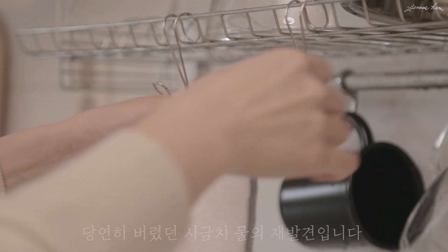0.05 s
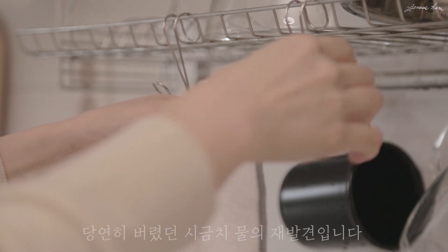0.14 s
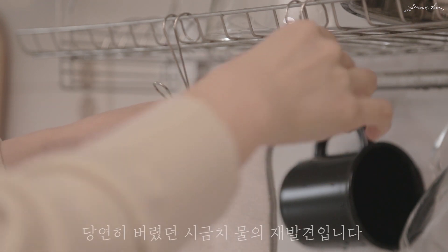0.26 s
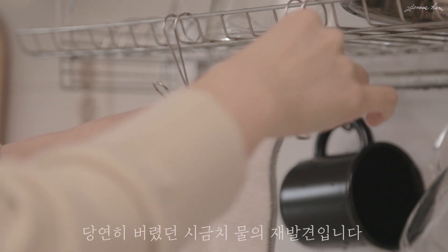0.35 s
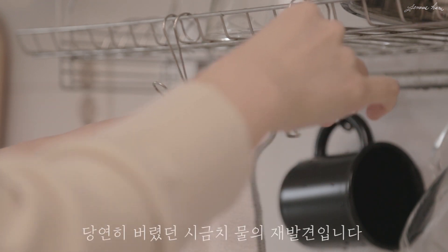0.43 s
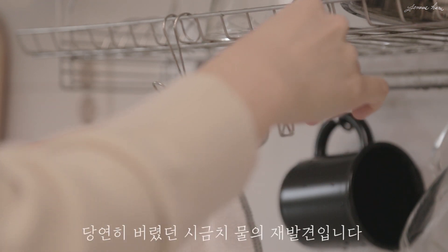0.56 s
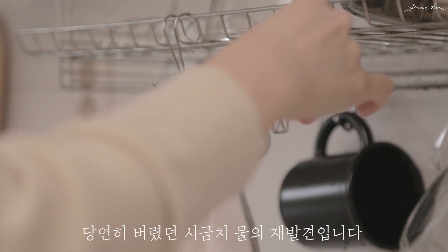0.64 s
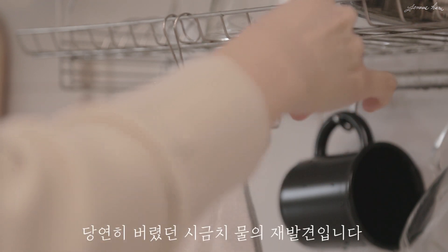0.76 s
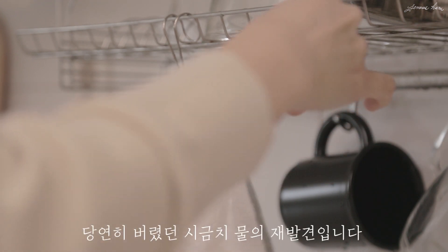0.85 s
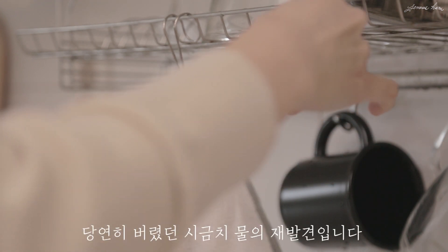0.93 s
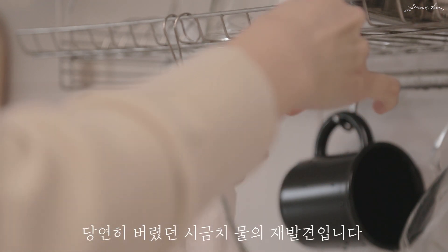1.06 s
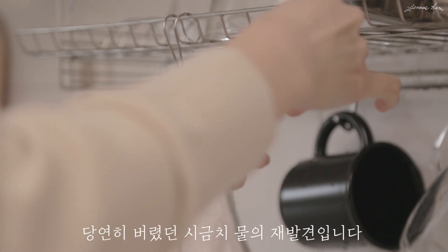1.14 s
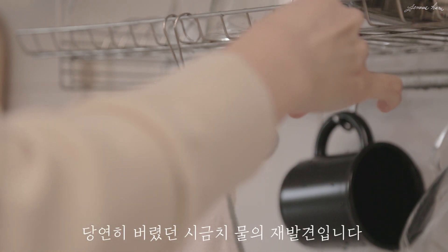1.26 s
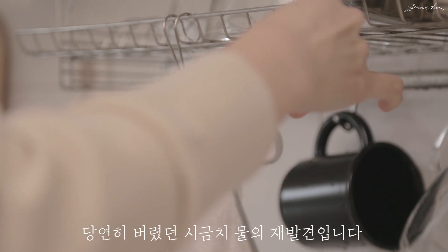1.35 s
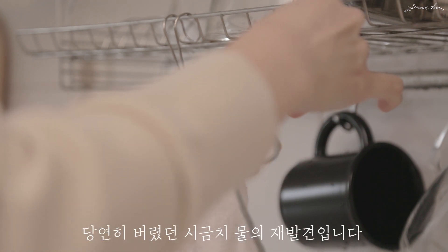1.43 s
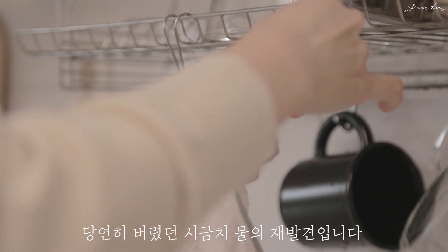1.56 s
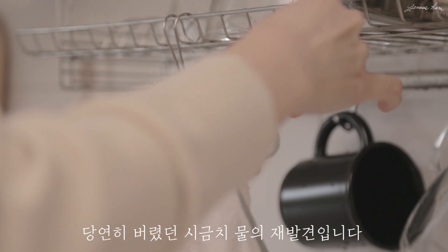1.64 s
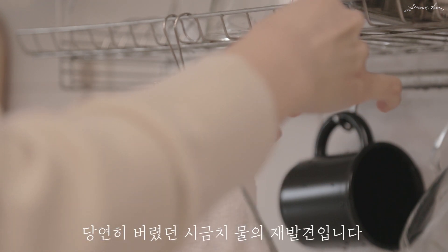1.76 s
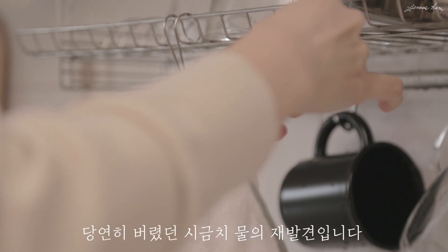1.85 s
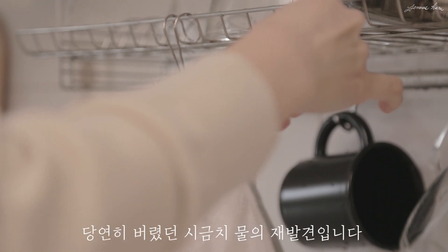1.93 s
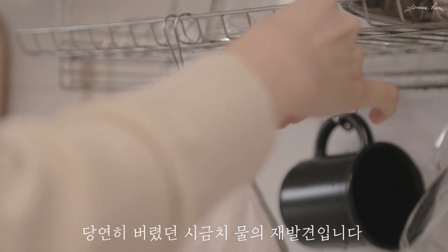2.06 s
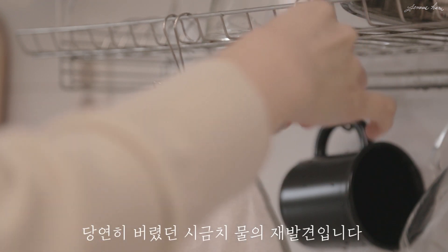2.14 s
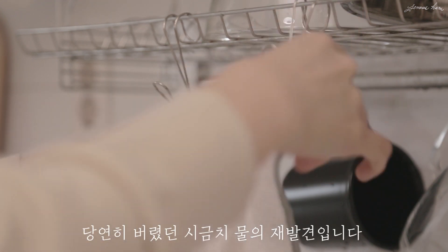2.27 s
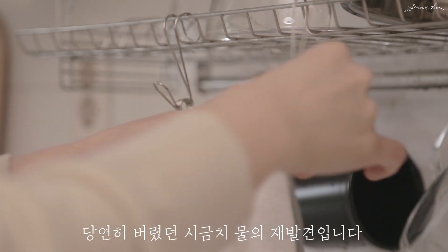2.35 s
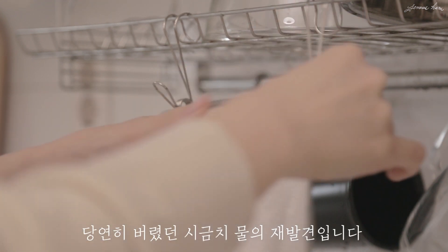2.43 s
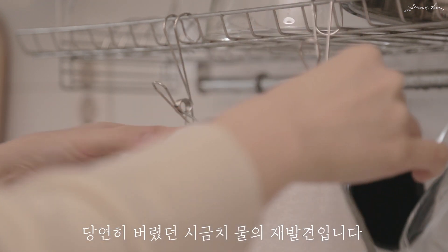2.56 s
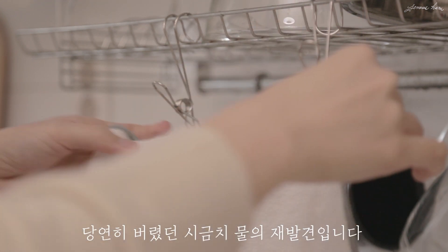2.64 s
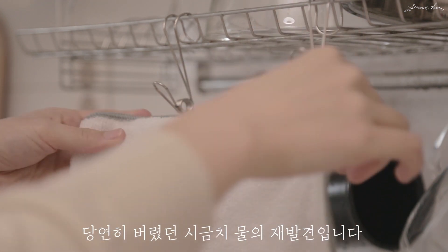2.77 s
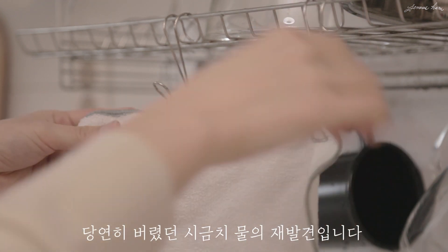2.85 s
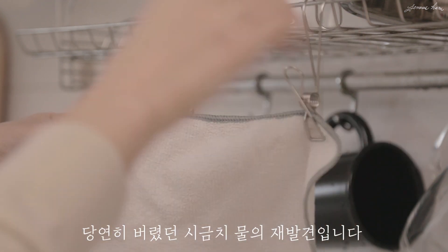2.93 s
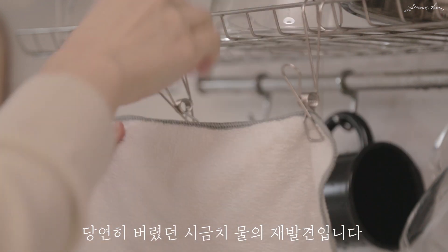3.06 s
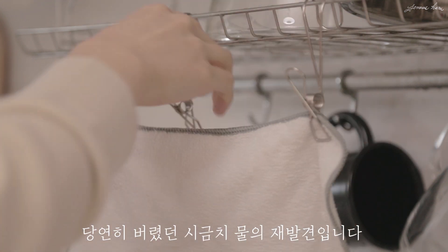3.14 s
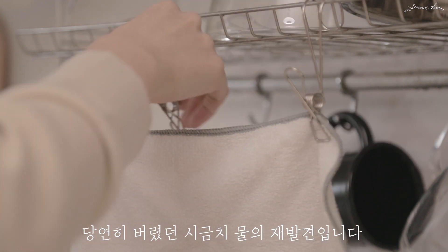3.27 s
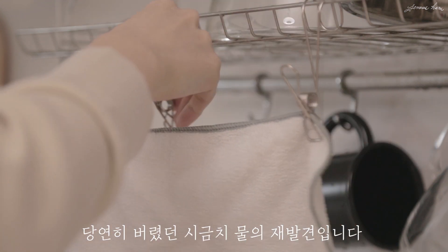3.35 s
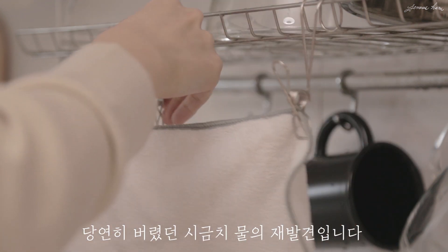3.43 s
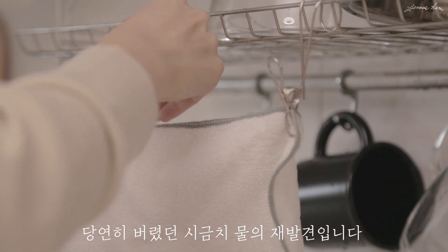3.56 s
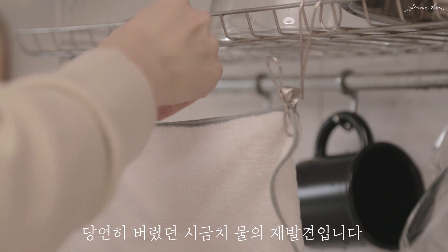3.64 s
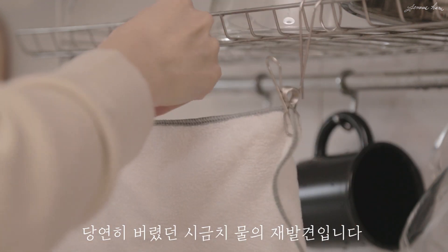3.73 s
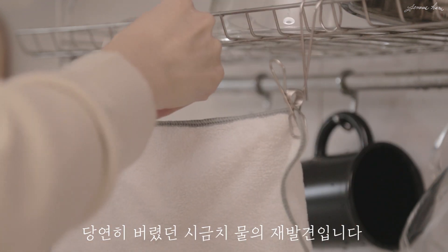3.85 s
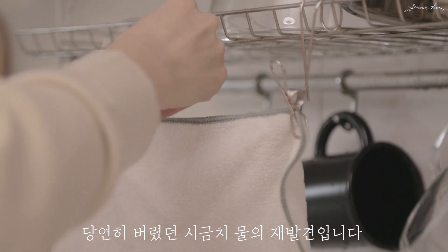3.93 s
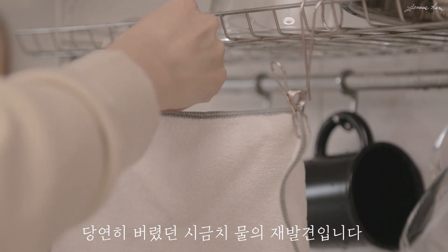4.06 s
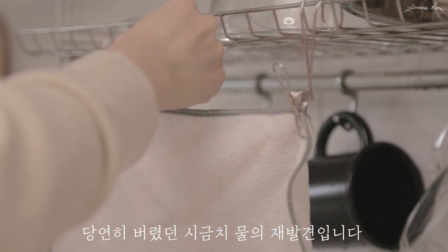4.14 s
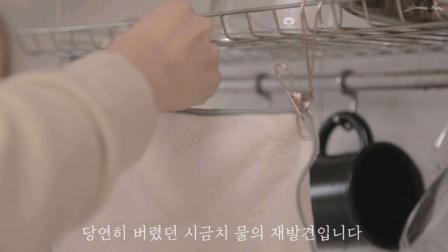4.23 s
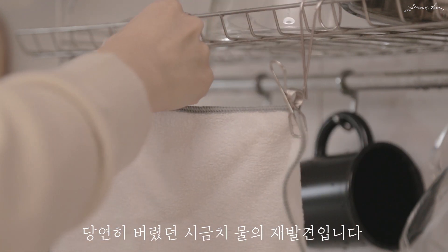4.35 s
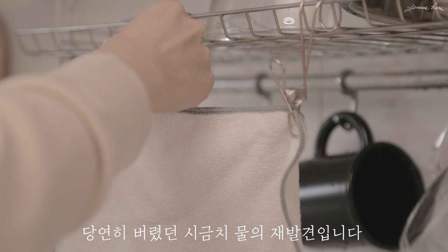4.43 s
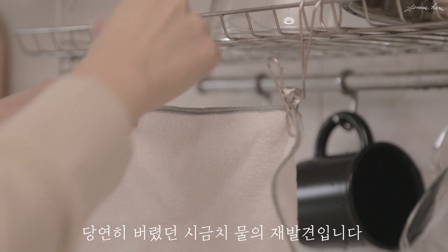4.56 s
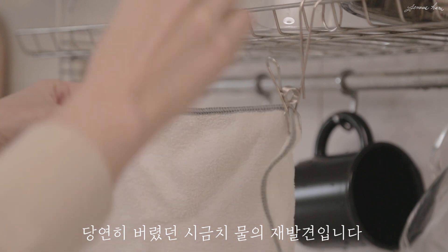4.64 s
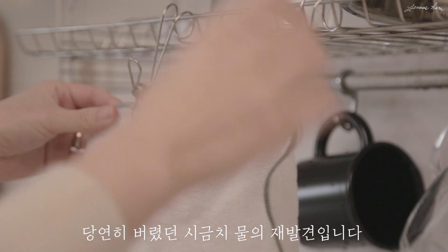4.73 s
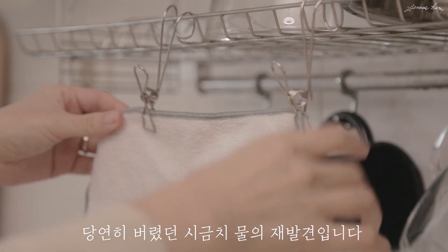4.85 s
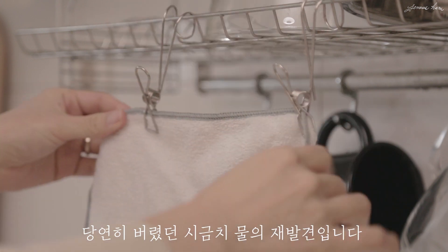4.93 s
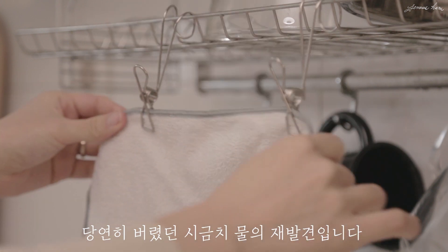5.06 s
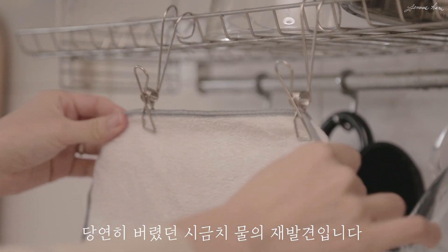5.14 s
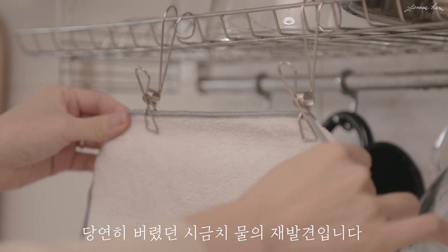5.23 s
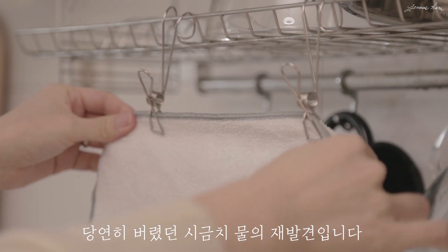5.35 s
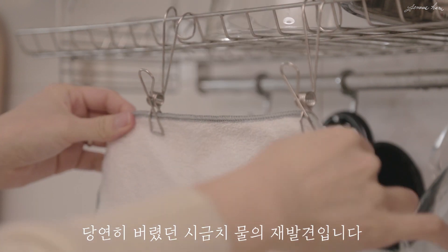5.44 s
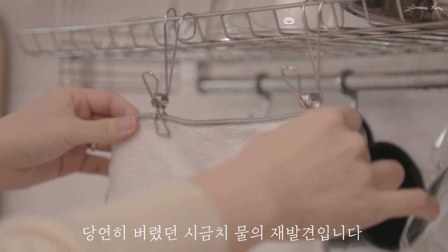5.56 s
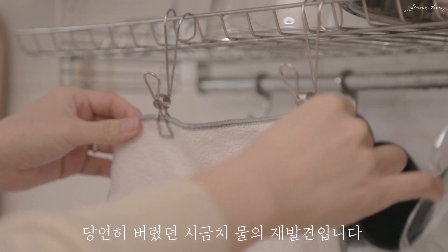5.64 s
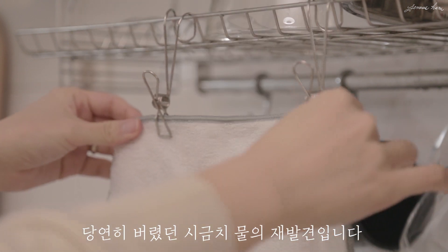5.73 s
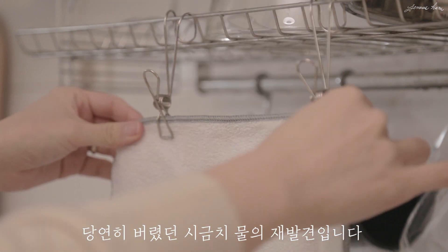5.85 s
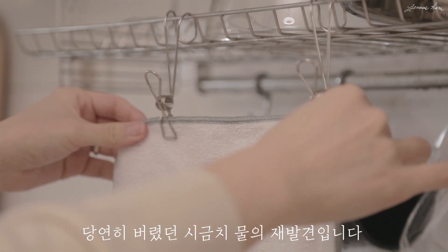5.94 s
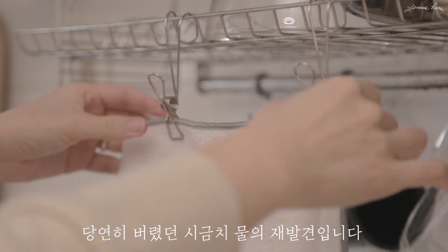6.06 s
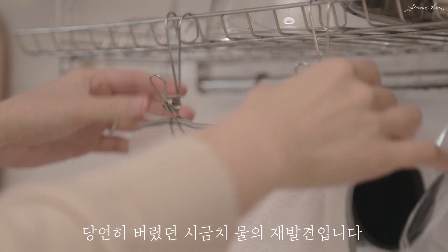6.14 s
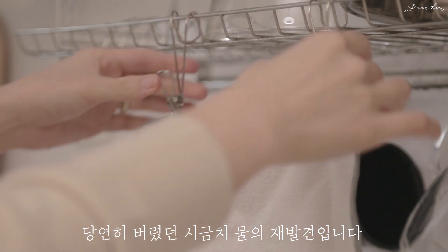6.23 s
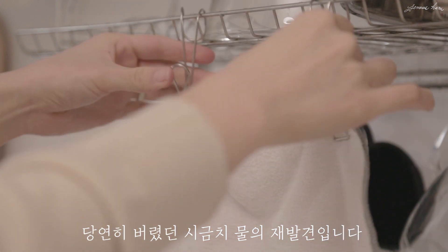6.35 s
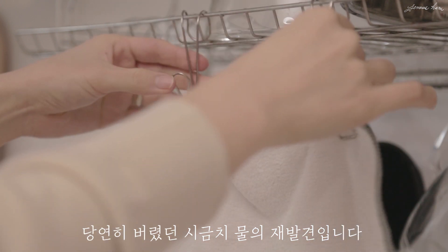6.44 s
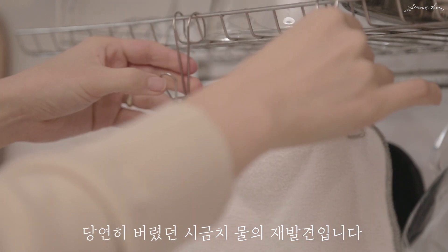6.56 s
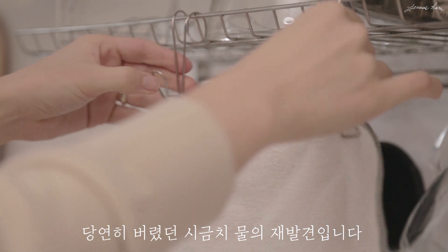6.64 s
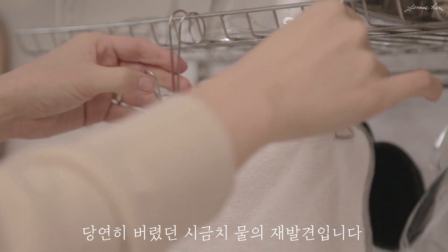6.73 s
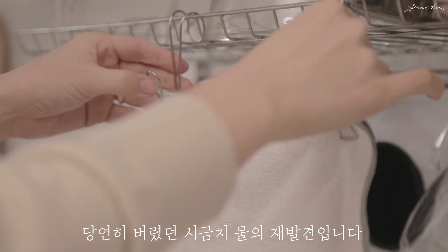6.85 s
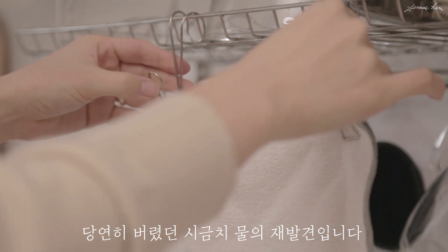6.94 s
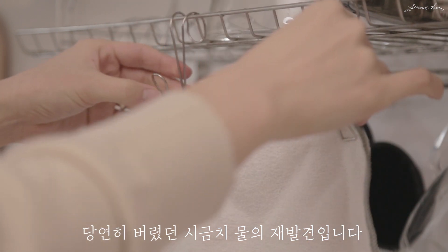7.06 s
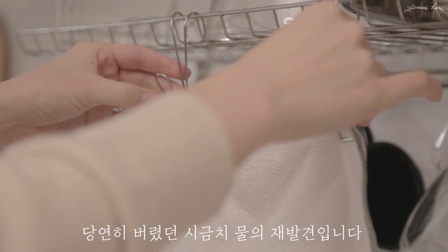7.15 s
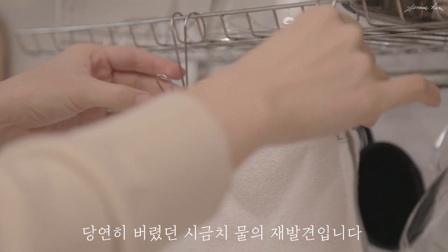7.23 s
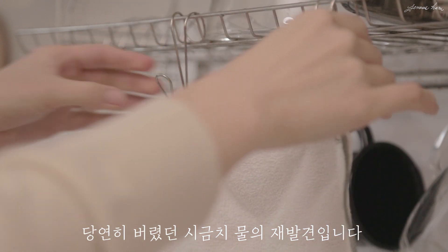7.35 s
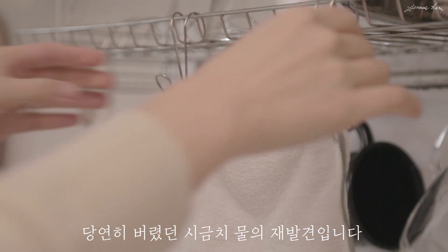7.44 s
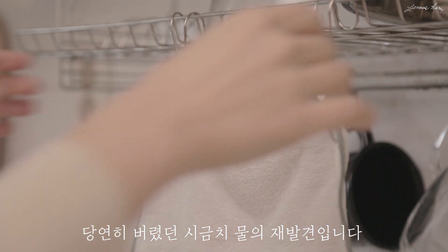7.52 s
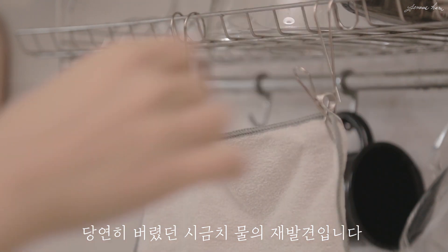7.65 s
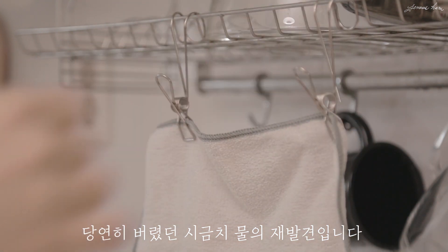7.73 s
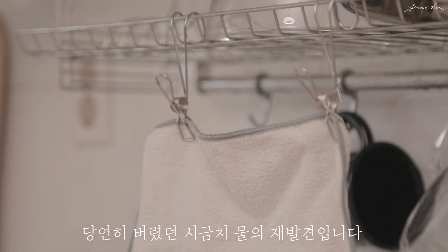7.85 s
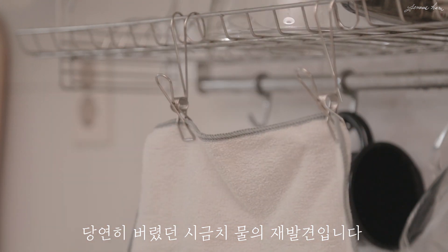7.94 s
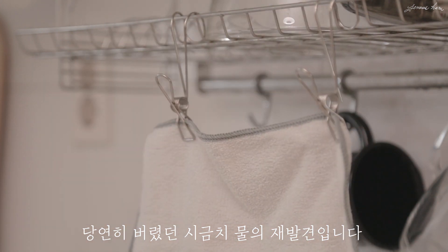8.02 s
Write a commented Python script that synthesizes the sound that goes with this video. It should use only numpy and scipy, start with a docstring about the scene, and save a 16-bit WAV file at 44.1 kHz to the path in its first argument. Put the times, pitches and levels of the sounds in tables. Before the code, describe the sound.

Thin steel hooks and sprung clips clink, scrape and snap against a wire dish rack in small uneven bursts, close up in a quiet kitchen.

```python
"""Sharp steel knocks and short scrapes ring out in a small, hard-walled kitchen: two clothespin hooks
on a wire dish rack, with sprung jaws that snap shut while a cloth is clipped to them.
Each contact is made of tiny impacts, heard through noise-like echoes and the tuned parts of the rack.
Fading sine waves let the rack, wires and jaws ring on, and the mounting creaks and thumps.
Faint filtered noise and a low hum lie underneath."""
import sys
import numpy as np
from scipy import signal
from scipy.fft import rfft, irfft, next_fast_len
from scipy.io import wavfile
from scipy.ndimage import uniform_filter1d, map_coordinates

SR = 44100
rng = np.random.default_rng(int(sys.argv[2]) if len(sys.argv) > 2 else 0)


def put_to_file(sound):
    """Save the sound as 16-bit audio at rate SR, in the file named by the first command-line argument."""
    columns = np.atleast_2d(sound).T  # one column per channel
    safe = np.clip(columns, -1, 1)
    whole_steps = np.round(safe * 32767)
    wavfile.write(sys.argv[1], SR, whole_steps.astype(np.int16))


N = 356769
TOP_HZ = 15850  # upper limit of the recorder's band
SIZE = 32768  # samples in one short sound
T, HZ = np.arange(SIZE) / SR, np.fft.rfftfreq(2 * SIZE, 1 / SR)

# how wide the echoes and rings are in stereo: pitch_hz [Hz], side_re_mid_db [dB]
STEREO_WIDTH = [(60, -9), (200, -4.5), (1000, -6), (2400, -7.5), (4400, -4), (8000, 2.5), (15000, -3.5)]


def knocks(mount, frame, wires, hook, jaws):
    """A blow and its chatter: bright ones ring hook and jaws, heavy ones the frame; a wire adds its note."""
    # a hook or its jaws strike the rack: start_s [s], level_db [dB], brightness_db (share of the jaws) [dB],
    # weight_db (share of the frame) [dB], wire_pitch_hz [Hz], chatter_s (time constant) [s]
    knock_list = [(0.4241, -33, 0.5, -10, 1986, 0.034), (0.5651, -34, 0.5, -5.5, 2210, 0.023),
                  (0.6484, -48.5, 5, -3, 1860, 0.0069), (0.9413, -23, 3.0, -5.0, 1840, 0.016),
                  (2.1804, -43.5, -43, -8, 1360, 0.02), (2.2717, -32, 0.5, -11.5, 2840.0, 0.013),
                  (2.3246, -32.5, 3, -1, 3840, 0.018), (2.4392, -37, -11.5, -16, 2660, 0.054),
                  (2.505, -29, 1.5, -24.5, 2640, 0.037), (2.5338, -30.5, 8.5, -4, 1500, 0.011),
                  (2.9472, -40, -7.5, -10, 2120, 0.022), (3.1472, -47, -5.5, -5, 1730, 0.018),
                  (3.1914, -50, -4.5, -16, 1830.0, 0.02), (3.3718, -34.5, 7, 1.5, 3140.0, 0.019),
                  (3.4308, -34.5, 1.5, -4, 2910, 0.015), (3.5092, -42.5, -1.5, -6.5, 2680, 0.021),
                  (3.6106, -34.5, -8, -11.5, 1890, 0.015), (3.675, -36, -1.5, -7, 2640, 0.023),
                  (4.3116, -40.5, -13.5, -8, 2090, 0.055), (4.5458, -39.0, -1.5, -9.5, 3820.0, 0.095),
                  (4.617, -24, -5.5, -5, 2940, 0.0037), (5.065, -35, 0.5, -5, 1690, 0.021),
                  (5.2638, -40.5, -4.5, -7, 2750, 0.022), (5.6102, -52, -9.5, -5, 1610, 0.014),
                  (5.6462, -52, -10, -8.5, 1640, 0.049), (5.7358, -35.5, -56, -26, 1730, 0.017),
                  (5.7711, -44, 0.5, -3, 1630, 0.018), (5.8179, -45, -18, -16, 2320.0, 0.0049),
                  (5.8739, -37.5, 2, -14.5, 2760, 0.016), (6.2977, -34.5, -5.5, -22, 3710.0, 0.018),
                  (6.374, -27, 0.5, -4.5, 2440, 0.054), (6.4112, -27.5, -7, -22, 2300.0, 0.024),
                  (6.5194, -31.5, 3.5, -14, 2830, 0.015), (6.5836, -38.5, 6.5, -13, 2070, 0.017),
                  (6.64, -34.5, -1, -2, 2730, 0.0064), (6.7962, -33, -3, -3.0, 2865, 0.028),
                  (6.8872, -32.5, 7, -4, 1840, 0.0051), (7.002, -44.5, -13, -22, 2470, 0.0045),
                  (7.217, -40.5, -0.5, -11.5, 2860, 0.019)]
    # long ring of the rack: pitch_hz [Hz], level_db [dB], t60_s [s]
    rack_modes = [(528, -9, .5), (594, -4, .5), (622, -7, .5), (684, -6, .75), (726, -7, .75),
                  (750, -6, .75), (977, -9, .5), (1017, -11, .6), (1157, -8, .45), (1285, -15, .7),
                  (2019, -11, .5), (2314, -11, .35), (2676, -14, .4), (2807, -10, .3), (2937, -10, .3),
                  (4075, -11, .45)]
    # ring of the spring-steel jaws: pitch_hz [Hz], level_db [dB], t60_s [s]
    jaw_modes = [(4936, -3, .2), (5663, -4, .18), (6440, -2, .16), (6627, -1, .16), (7171, 1, .22),
                 (7540, -2, .2), (8553, -4, .2), (9430, -1, .2), (10100, -4, .16), (11825, -4, .16)]
    wires_db, note_db, rack_ring_db, jaw_ring_db = -6, -7, -11.5, -15
    note_width_hz = 310  # of each of two resonances in a row; the hand damps the struck wire
    track = np.zeros((2, N))
    for start_s, level_db, bright_db, weight_db, wire_hz, chatter_s in knock_list:
        rebounds = 0.38 * taps(rate=2500) * np.exp(-T / max(chatter_s, .001))
        blow = kitchen(signal.unit_impulse(SIZE)) + kitchen(rebounds)
        blow_spectrum = rfft(blow, 2 * SIZE) * touch(depth_db=2.5, step_hz=168.9)

        def shaken(part):
            """The blow heard through one part, at a standard loudness."""
            return crest(irfft(blow_spectrum * part)[:, :SIZE])

        sound = amp(wires_db) * shaken(wires)
        sound += amp(note_db) * shaken(resonance(wire_hz, note_width_hz) ** 2)
        # heavier contacts move the mounting more
        sound += amp(-24 + 0.21 * weight_db) * shaken(mount)
        rack_ring = ring(rack_modes, scatter_db=5.5, swell_s=0.037, line_width_hz=2.9)
        sound += amp(weight_db) * (shaken(frame) + amp(rack_ring_db) * rack_ring)
        # brighter contacts excite the hook more
        sound += amp(-2.5 + 0.28 * bright_db) * shaken(hook)
        jaw_ring = ring(jaw_modes, scatter_db=2.5, swell_s=.012, line_width_hz=22)
        sound += amp(bright_db) * (amp(-1.1) * shaken(jaws) + amp(jaw_ring_db) * jaw_ring)
        add(track, start_s, amp(level_db) * sound)
    return track


def slides(mount, frame, wires, hook, jaws):
    """A hook scrapes along a wire; its trembling jaws add the brightness."""
    # a hook is dragged along a wire: start_s [s], length_s [s], level_db [dB], brightness_db [dB]
    slide_list = [(0.401, 0.034, -56.5, -2), (0.912, .022, -58, -8), (1.055, 0.065, -46.5, -1),
                  (2.259, 0.013, -38.5, -1), (2.453, 0.14, -39, -4), (2.88, 0.073, -51, -14.5),
                  (3.357, 0.046, -43, -1), (3.712, .11, -50.5, -20), (4.285, 0.067, -43, -6),
                  (4.579, 0.08, -39, 2), (4.61, 0.021, -30, 7.5), (5.13, 0.073, -43, -12.5),
                  (5.825, 0.06, -51, -2), (6.324, 0.082, -40.5, -3.5), (6.548, 0.16, -41.5, 0.5),
                  (7.319, .06, -61.5, -14)]
    frame_db, mount_db = -9.5, -22.5  # a light drag barely moves the heavy parts
    track = np.zeros((2, N))
    for start_s, length_s, level_db, bright_db in slide_list:
        rub = rubbing(length_s)
        sound = scraped(rub, wires, hook)
        for part, part_db in (mount, mount_db), (frame, frame_db), (jaws, bright_db):
            sound += amp(part_db) * crest(filtered(rub, part))
        add(track, start_s, amp(level_db) * sound)
    return track


def pings():
    """A free wire or a hook's jaws ring with one clear note, which reaches each side at its own phase."""
    # blows that set a free length of wire, or a hook's sprung jaws, ringing: start_s [s], pitch_hz [Hz],
    # level_db [dB], t60_s [s]
    ping_list = [(.425, 9330, -26, 0.15), (.566, 6600, -20, 0.069), (2.507, 7170, -43, .15),
                 (5.066, 9500, -34, .17), (6.643, 2930, -24, 0.079), (.945, 952, -38, 0.41),
                 (.945, 4360, -44, 0.18), (.945, 2918, -36, 0.19), (.567, 732, -34, 0.34),
                 (.77, 735, -63, 0.73), (4.619, 2020, -41, 0.54), (4.547, 3260, -40, 0.27),
                 (5.612, 4020, -54.5, 0.35), (7.219, 595, -47.5, 0.49), (1.125, 1290, -50, 0.54),
                 (2.538, 1274, -30, 0.26), (2.536, 4130, -36.5, 0.39), (2.536, 2667, -29.5, .2),
                 (2.536, 7170, -33, .16), (2.536, 8552, -38.5, 0.22), (2.951, 1015, -43, 0.27),
                 (4.412, 507, -38, 0.24), (4.612, 2790, -22, 0.12), (4.619, 1015, -36, 0.39),
                 (4.619, 4900, -33.5, 0.3), (5.066, 1488, -36.5, 0.47), (6.68, 894, -48, 1)]
    track = np.zeros((2, N))
    for start_s, pitch_hz, level_db, t60_s in ping_list:
        phase = rng.normal(0, 0.51, (2, 1)) * amp(along(STEREO_WIDTH, pitch_hz))
        note = np.sin(2 * np.pi * pitch_hz * T + phase)
        envelope = fade(T, t60_s) * (1 - fade(T, 0.043))
        add(track, start_s, amp(level_db) * note * envelope)
    return track


def shifts(mount, frame, wires, hook, jaws):
    """The rack shifts under the hand: its frame rubs on the mounting with a dull creak."""
    # creaks of the shifting rack: start_s [s], length_s [s], frame_db [dB], mounting_db [dB]
    shift_list = [(1.181, 0.04, -51, -71), (1.271, 0.015, -63.5, -82), (2.055, 0.059, -46, -59.5),
                  (2.109, 0.038, -48.5, -50), (2.19, 0.091, -49, -60), (2.754, 0.063, -55.5, -71),
                  (3.864, 0.075, -56.5, -90), (4.048, .04, -65, -83), (4.37, 0.053, -43.5, -86),
                  (6.087, 0.077, -60, -74)]
    wires_db, jaws_db = -10, -19  # the wires and hanging hooks tremble with the frame
    track = np.zeros((2, N))
    for start_s, length_s, frame_db, mount_db in shift_list:
        rub = rubbing(length_s)
        creak = crest(filtered(rub, frame))
        creak += amp(wires_db) * scraped(rub, wires, hook)
        creak += amp(jaws_db) * crest(filtered(rub, jaws))
        add(track, start_s, amp(frame_db) * creak + amp(mount_db) * thud(rub, mount))
    return track


def jolts(mount, sway_hz=105, t60_s=0.17):
    """The rack's whole weight thuds on its mounting and gives one low, quickly damped push."""
    # tugs that jolt the whole rack: start_s [s], thud_db (mounting) [dB], sway_db (low push) [dB]
    jolt_list = [(0.421, -47, -82), (.566, -39, -77.5), (0.944, -35.5, -49.5), (2.506, -45, -93),
                 (2.951, -47, -78), (3.676, -50, -69), (4.619, -49, -65), (6.641, -45, -59),
                 (6.797, -39, -64), (6.887, -46, -53.5)]
    track = np.zeros((2, N))
    for start_s, thud_db, sway_db in jolt_list:
        blow = kitchen(signal.unit_impulse(SIZE))
        push = filtered(blow, resonance(sway_hz, 64) ** 2) * fade(T, t60_s)
        add(track, start_s, amp(thud_db) * thud(blow, mount) + amp(sway_db) * crest(push))
    return track


def thud(force, mount):
    """The mounting answers with a dull knock and its hollow note."""
    # hollow note of the mounting: pitch_hz [Hz], level_db [dB], t60_s [s]
    mount_modes = [(258, 0, .32), (286, -6, .25)]
    knock = crest(filtered(force, mount))
    hollow_note = crest(ring(mount_modes, scatter_db=2, swell_s=0.077, line_width_hz=5.6))
    return amp(-2.0) * knock + amp(-5) * hollow_note


def rubbing(length_s):
    """Steel sticks and slips in a swell of tiny impacts."""
    stroke = np.abs(np.sin(np.pi * np.minimum(T / length_s, 1))) ** 0.31
    return kitchen(taps(rate=990) * stroke)


def scraped(rub, wires, hook):
    """Rubbing sounds the wires and, more dully than a blow, the hook."""
    dull_hook = hook / (1 + 1j * HZ / 2600) ** 2
    return amp(-2.0) * crest(filtered(rub, wires)) + amp(-4.5) * crest(filtered(rub, dull_hook))


def taps(rate):
    """Tiny random impacts of steel on steel, on average rate a second."""
    return (rng.random(SIZE) < rate / SR) * rng.standard_normal(SIZE)


def touch(depth_db, step_hz):
    """Each point of contact favours other modes: a random, smooth rise and fall over pitch."""
    knots = rng.standard_normal(512)
    return amp(depth_db * map_coordinates(knots, [HZ / step_hz], mode="mirror"))


def ring(modes, scatter_db, swell_s, line_width_hz):
    """Lightly damped modes, at new strengths for each blow; the loose hooks blur their phase."""
    hz, level_db, t60_s = np.transpose(modes)[:, :, None]
    # a random walk in phase smears each note over the line width
    steps = rng.standard_normal((len(hz), SIZE))
    drift = np.cumsum(steps, axis=1) * np.sqrt(2 * np.pi * abs(line_width_hz) / SR)
    strength = amp(level_db + scatter_db * rng.standard_normal(hz.shape))
    notes = np.sin(2 * np.pi * (hz * T + rng.random(hz.shape)) + drift)
    notes = strength * fade(T, t60_s) * notes
    side = amp(along(STEREO_WIDTH, hz[:, 0])) * rng.uniform(-1.2, 1, len(hz))
    return spread([np.ones(len(hz)), 1], side) @ notes * (1 - fade(T, swell_s))


def resonance(hz, width_hz):
    """Response of one damped mode."""
    return 1 / (1 + 2j * (HZ - hz) / width_hz)


def body(low_hz, high_hz, order=6):
    """Causal response of the part that rings between two frequencies."""
    # smooth colour of steel knocking on the rack: pitch_hz [Hz], level_db [dB per Hz, relative]
    steel_colour = [(60, -6), (110, -9), (220, -8.5), (420, -11), (540, -6.5), (900, -10.5), (1600, -1.5),
                    (3000, 0), (4600, -4.5), (7000, 2), (10500, -3.5), (12200, -6.5), (13300, -16),
                    (15500, -29)]
    # resonances that stand out of it: pitch_hz [Hz], width_hz [Hz], lift_db [dB]
    steel_peaks = [(258, 18, 16), (286, 14, 10), (360, 26, 5), (405, 30, 3), (605, 50, 10), (690, 40, 7),
                   (750, 45, 8), (980, 28, 6), (1160, 32, 5), (1650, 120, 2), (1840, 150, 2), (2560, 60, 3),
                   (2815, 55, 5), (2937, 36, 5), (3280, 110, 3), (4050, 120, 4), (4310, 200, 3),
                   (7180, 70, 3), (7550, 120, 3), (9480, 250, 3), (10100, 200, 2), (11820, 120, 4)]
    lift = sum((amp(db) ** 2 - 1) / (1 + (2 * (HZ - hz) / width) ** 2) for hz, width, db in steel_peaks)
    power = amp(along(steel_colour, HZ)) ** 2 * np.maximum(1 + lift, .1)
    power = power / (1 + (low_hz / (HZ + 1)) ** (2 * order))
    power = power / (1 + (HZ / high_hz) ** (2 * order))
    # folding the cepstrum gives minimum phase: the part answers at once, never before the blow
    cepstrum = irfft(np.log(power + 1e-12) / 2)
    cepstrum[1:SIZE] *= 2
    cepstrum[SIZE + 1:] = 0
    return np.exp(rfft(cepstrum))


def parts():
    """Heavy parts answer low, light ones high: mounting, rack frame, rack wires, hook and jaws."""
    mount, frame = body(122, 450, order=4), body(457, 756)
    wires, hook, jaws = body(946, 1944), body(2410, 4800), body(3750, SR / 2)
    return mount, frame, wires, hook, jaws


def kitchen(force, near_t60_s=0.17, tail_db=-5.0, build_s=0.0019):
    """A force heard through the room: dense echoes from shelf and wall, then the longer tail."""
    # how long the room's tail lasts: pitch_hz [Hz], t60_s [s]
    room_tail = [(100, 0.17), (260, 0.49), (700, 0.53), (1840, 0.37), (4850, 0.32), (12800, 0.28)]
    hz, t, z = signal.stft(rng.standard_normal((2, SIZE)), SR, nperseg=256)
    tail = amp(tail_db) * fade(t, along(room_tail, hz)[:, None])
    decay = np.hypot(fade(t, near_t60_s), tail)
    z = spread(z * decay, amp(along(STEREO_WIDTH, hz))[:, None])
    echoes = signal.istft(z, SR, nperseg=256)[1][:, :SIZE] * (1 - fade(T, build_s))
    return filtered(echoes, rfft(force, 2 * SIZE))


def background(hum_hz=61.4, hum_db=-83):
    """Room air and microphone hiss as coloured random noise, with a faint hum as one sine wave."""
    # colour of the noise: pitch_hz [Hz], level_db [dB per Hz, relative]
    air_colour = [(15, -52), (25, -16.5), (43, -12), (59, -1.5), (86, -8), (260, -5), (289, -11),
                  (340, -5.5), (495, -9.5), (666, -11), (1240, -14), (1950, -15), (2490, -16.5),
                  (4870, -18.5), (15500, -20.5)]
    # stereo width of the noise: pitch_hz [Hz], side_re_mid_db [dB]
    air_width = [(50, 1.5), (200, -1), (1000, -2.5), (5000, -0.5), (15000, 0)]
    size = next_fast_len(N, True)
    hz = np.fft.rfftfreq(size, 1 / SR)
    noise = rfft(rng.standard_normal((2, size))) * amp(along(air_colour, hz)) * (hz < TOP_HZ)
    air = irfft(spread(noise, amp(along(air_width, hz))))[:, :N]
    hum = np.sin(2 * np.pi * hum_hz * np.arange(N) / SR)
    return amp(-64.5) * air / air.std() + amp(hum_db) * hum


def amp(db):
    """Decibels to gain."""
    return 10 ** (np.asarray(db) / 20)


def along(points, hz):
    """(Hz, value) points read on a log axis."""
    f, v = np.transpose(points)
    return np.interp(np.log(hz + 1), np.log(f), v)


def fade(t, t60_s):
    """Exponential decay by 60 dB in t60_s seconds."""
    return np.exp(-np.log(1000) * t / np.maximum(t60_s, 1e-4))


def filtered(x, response):
    """A short sound through a frequency response."""
    return irfft(rfft(x, 2 * SIZE) * response)[..., :SIZE]


def crest(x, size=660):
    """Scale a stereo sound so that its loudest moment (size samples long) has rms 1."""
    return x / np.sqrt(uniform_filter1d(np.mean(x ** 2, axis=0), size).max() + 1e-20)


def spread(pair, side):
    """Two signals, as middle and side, to left and right with the given side gain."""
    return np.array([pair[0] + side * pair[1], pair[0] - side * pair[1]]) / np.sqrt(1 + side ** 2)


def add(track, start_s, sound):
    """Mix a sound into the track at its start time."""
    part = track[:, round(start_s * SR):][:, :SIZE]
    part += sound[:, :part.shape[1]]


def scene():
    """All sounds of the rack, which hangs a little to the right of the microphone, over the background."""
    # balance between the sides: pitch_hz [Hz], left_re_right_db [dB]
    side_balance = [(100, 1.5), (1000, -1.5), (4000, -0.5), (13000, -2.5)]
    steel = parts()
    size = next_fast_len(N + SIZE, True)
    lean_db = along(side_balance, np.fft.rfftfreq(size, 1 / SR))
    rattle = knocks(*steel) + slides(*steel) + pings() + shifts(*steel) + jolts(mount=steel[0])
    rattle = rfft(rattle, size) * amp(np.array([lean_db, -lean_db]) / 2)
    return irfft(rattle, size)[:, :N] + background()


def record(dry):
    """The recorder keeps nothing above its band limit."""
    size = next_fast_len(N + SIZE, True)
    in_band = np.fft.rfftfreq(size, 1 / SR) < TOP_HZ
    return irfft(rfft(dry, size) * in_band, size)[:, :N]


dry = scene()
out = record(dry)
put_to_file(out)
```